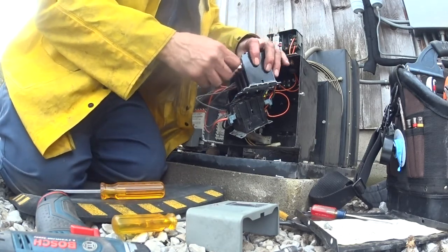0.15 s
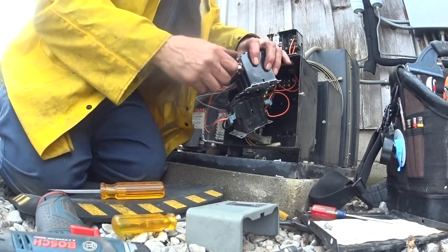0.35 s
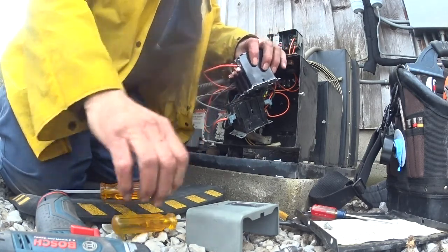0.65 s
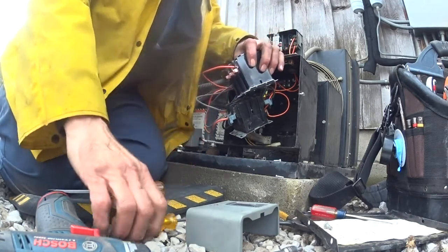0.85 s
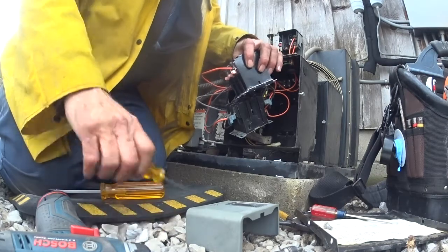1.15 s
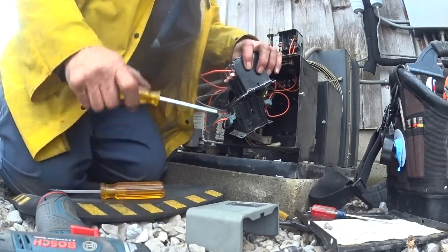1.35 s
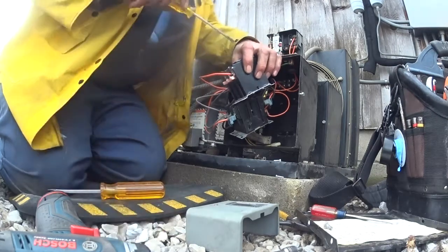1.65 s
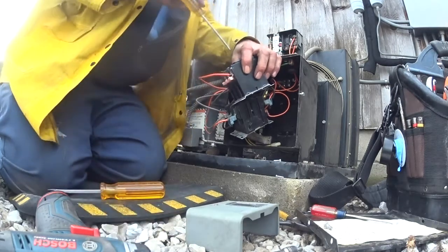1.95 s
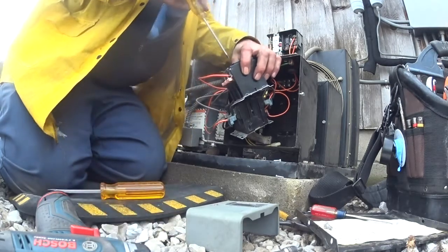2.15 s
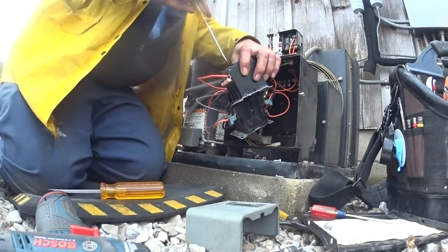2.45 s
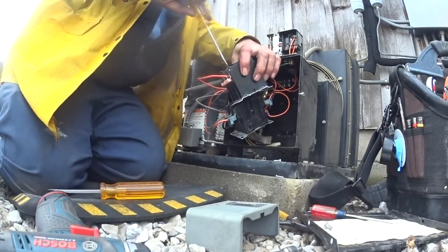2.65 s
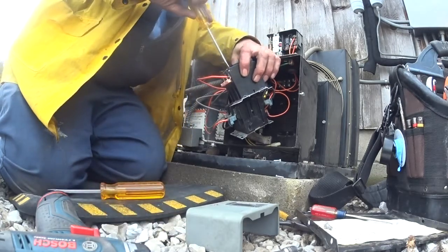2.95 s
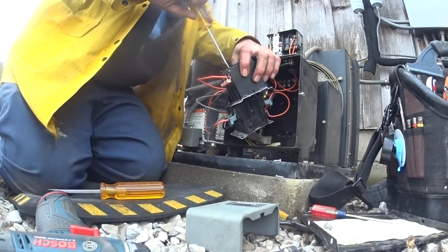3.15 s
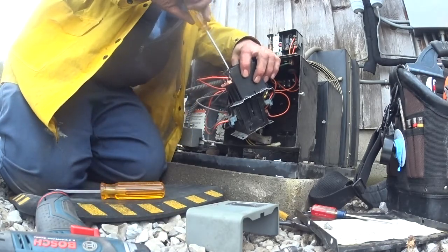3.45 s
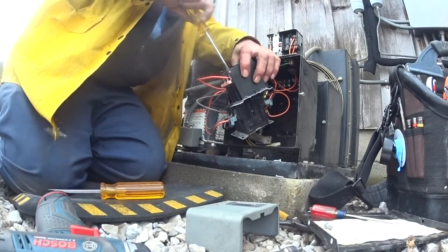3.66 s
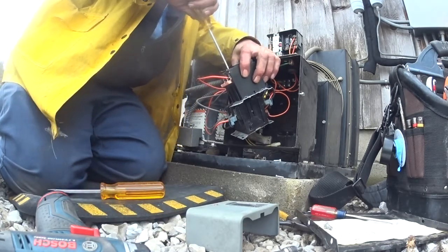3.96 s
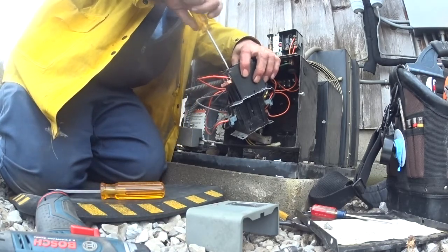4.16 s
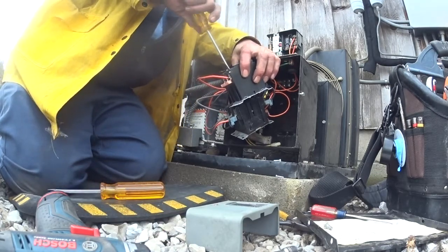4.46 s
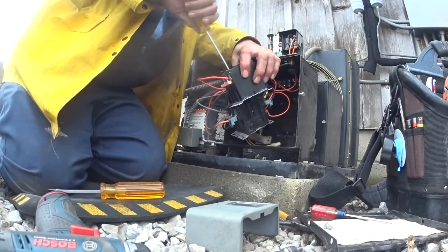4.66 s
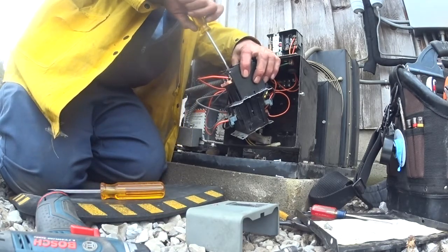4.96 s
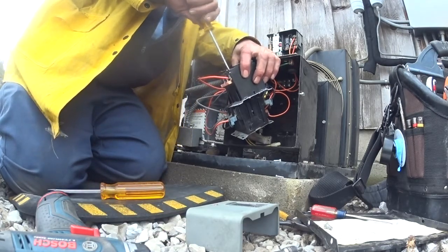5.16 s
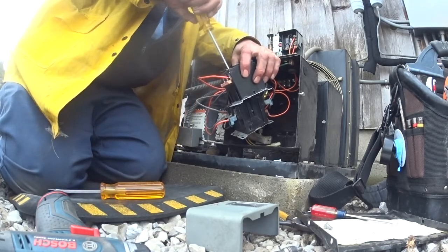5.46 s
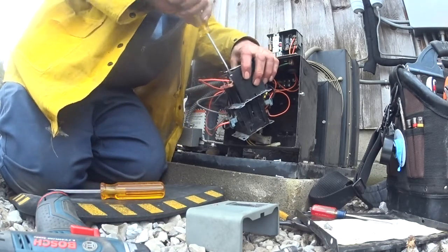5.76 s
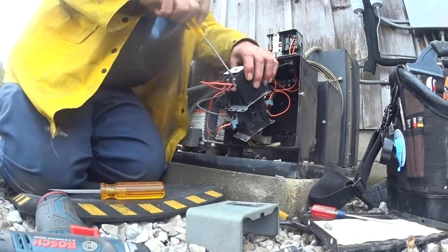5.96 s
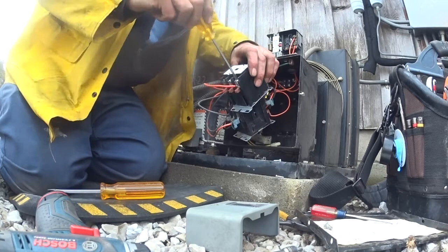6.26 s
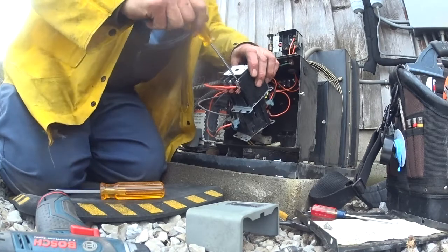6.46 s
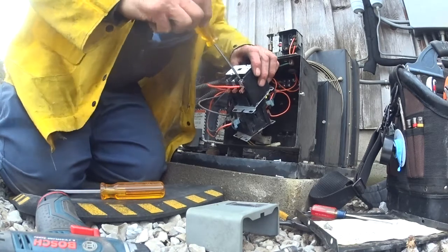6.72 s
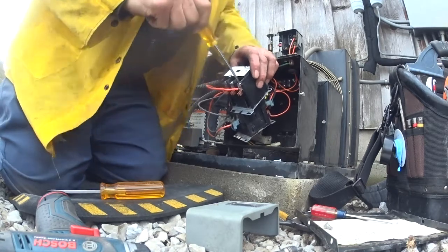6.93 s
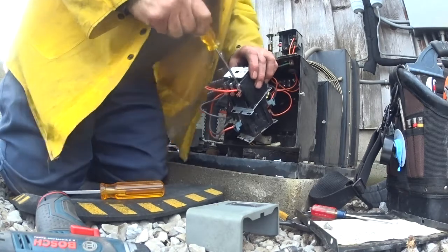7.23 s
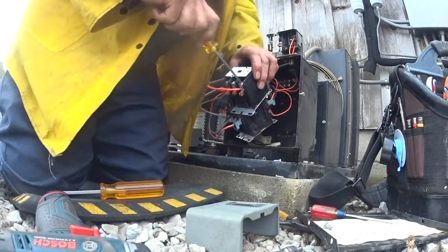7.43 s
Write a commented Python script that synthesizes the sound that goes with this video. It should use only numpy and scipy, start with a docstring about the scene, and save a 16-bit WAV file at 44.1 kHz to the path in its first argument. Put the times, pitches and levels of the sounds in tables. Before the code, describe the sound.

Heard from close by outdoors, the compressor of an air conditioner hums and buzzes throughout over a light hiss. Early on, a metal tool clicks against stones with a short rustle. Later a relay snaps shut with a brief rattle, and the fan gathers speed until its whoosh and low drone fill out the sound. Small screwdriver scrapes and pings come now and then.

```python
"""A close, steady buzz from an outdoor air-conditioning condenser: compressor tones beat against mains hum
over a hiss of refrigerant. A screwdriver clinks on gravel as it is picked up, then scrapes and pings
on a terminal of the contactor. The contactor clacks shut and the fan spins up to a steady rush.
The buzz changes colour as the worker leans over the unit."""
import sys
import numpy as np
from scipy import signal
from scipy.fft import rfft, irfft, next_fast_len
from scipy.io import wavfile
from scipy.ndimage import map_coordinates

SR = 44100
rng = np.random.default_rng(int(sys.argv[2]) if len(sys.argv) > 2 else 0)


def store_pcm(level_fs):
    """Save levels as 16-bit WAV."""
    pcm = np.round(np.clip(level_fs, -1, 1) * 32767).astype(np.int16)
    wavfile.write(sys.argv[1], SR, np.atleast_2d(pcm).T)


N = 334719

MAINS_HZ, SHAFT_HZ, TOP_HZ = 60, 58.78, 11030
BEAT_DIP_S = 5.31  # hum and low compressor tones in antiphase

# Base envelope of the weak harmonics: f/Hz, level/dB
BUZZ_ENVELOPE = [(60, -58), (180, -62), (650, -50.5), (1200, -60.5), (1600, -56.5), (2100, -58.5),
                 (2350, -50), (2850, -59.5), (3200, -49), (3450, -66.5), (3900, -60), (4650, -68.5),
                 (5150, -55), (5700, -62.5), (7200, -63), (8000, -67), (9600, -62.5), (11000, -66.5)]
# Prominent harmonics: shaft order, base level/dB
STRONG_TONES = [(2, -39), (4, -20), (5, -46), (6, -35), (8, -34), (12, -43), (14, -39), (15, -39),
                (17, -40.5), (18, -41), (20, -39), (24, -40.5), (26, -42), (27, -43), (28, -42), (33, -45),
                (37, -45), (41, -46), (43, -45), (60, -43.5), (61, -43), (96, -59)]
# The leaning body alters the sound paths: shaft order, level change/dB
LEAN_CHANGES = [(4, -2), (8, 3), (18, -4), (20, -2), (24, -5), (27, 4), (28, 2), (33, -7), (41, 6),
                (60, -12), (61, 1.5), (96, 13)]
# Balance of the harmonics: f/Hz, left minus right/dB
TONE_PAN = [(120, 7.5), (235, 5), (350, 2), (650, -7), (1050, -5), (1420, -27), (2150, -11), (2450, -2.5),
            (3200, -7), (3700, -5.5), (10000, -1.5)]


def compressor(turns, even_lift_db=8.5, even_below_hz=1800, waver=0.27, lean_mid_s=5.47, lean_span_s=0.81):
    """Each shaft turn repeats one buzzing cycle; its harmonics waver, and shift as the worker leans in."""
    frames, cycle_size = 48, 4096
    orders = np.arange(1, int(TOP_HZ / SHAFT_HZ) + 1)
    hz = orders * SHAFT_HZ
    # two strokes a turn lift the low even orders
    low_even = (orders % 2 == 0) / (1 + (hz / even_below_hz) ** 6)
    upright_db = log_interp(BUZZ_ENVELOPE, hz) + even_lift_db * low_even
    upright_db += rng.normal(0, 3.5, len(hz))
    shift_db = rng.normal(0, 3.0, len(hz))
    pan_db = log_interp(TONE_PAN, hz) + rng.normal(0, 1.0, len(hz))
    for order, db in STRONG_TONES:
        upright_db[order - 1] = db + 0.07
        shift_db[order - 1] = 0
        pan_db[order - 1] = log_interp(TONE_PAN, order * SHAFT_HZ)
    for order, db in LEAN_CHANGES:
        shift_db[order - 1] = db
    frame_s = np.linspace(0, N / SR, frames)[:, None]
    lean = np.clip(.5 + (frame_s - lean_mid_s) / lean_span_s, 0, 1)
    # the lowest tones push in step with the shaft; casing resonances scramble the rest
    phase = rng.uniform(0, 2 * np.pi, len(hz)) * (orders > 4)
    drift = rng.standard_normal((frames, len(hz))) + 1j * rng.standard_normal((frames, len(hz)))
    sway_db = rng.normal(0, 0.52, (frames, 1))
    level = amp(upright_db + lean * shift_db + sway_db)
    tones = level * np.exp(1j * phase) * (1 + waver * hz / (hz + 1500) * drift)
    spectra = np.pad(tones * stereo_gains(hz, pan_db)[:, None], ((0, 0), (0, 0), (1, 0)))
    # one cycle per frame, read by shaft angle
    cycles = irfft(spectra, cycle_size) * cycle_size / np.sqrt(2)
    position = [np.linspace(0, frames - 1, N), turns % 1 * cycle_size]
    return np.array([map_coordinates(channel, position, order=1, mode="grid-wrap") for channel in cycles])


def mains_hum(speed, core_db=-48, idle_db=-47, fan_motor_db=-35, sheet_db=-45):
    """Magnetic hum at even mains multiples; the slipping compressor beats against it."""
    t = clock() - BEAT_DIP_S

    def tone(order, pan_db):
        hz = order * MAINS_HZ
        return -np.sqrt(2) * np.real(stereo_gains(hz, pan_db)[:, None] * np.exp(2j * np.pi * hz * t))

    core = amp(core_db) * tone(2, pan_db=6)
    motors = (amp(idle_db) + amp(fan_motor_db) * np.sqrt(speed)) * tone(4, pan_db=6)
    sheet = amp(sheet_db) * tone(10, pan_db=-3)
    return core + motors + sheet


def fan_speed(start_s=4.22, run_up_s=2.3, bend=1.25, knee=12):
    """Fraction of full speed: the motor pulls the fan up almost evenly, then levels off sharply."""
    ramp = (np.maximum(clock() - start_s, 0) / run_up_s) ** bend
    return ramp / (1 + ramp ** knee) ** (1 / knee)


# Air rush at full speed: f/Hz, density/(dB per Hz)
AIR_SPECTRUM = [(20, -72), (55, -65), (120, -54.5), (180, -45), (300, -45), (450, -45.5), (620, -44),
                (800, -48), (1100, -55.5), (1600, -65), (2500, -66.5), (4000, -74), (7000, -82),
                (11000, -82.5)]
# Blade tones at full speed, before the grille: blade-pass order, level/dB
BLADE_TONES = [(1, -30), (2, -37), (5, -52)]


def fan(speed, full_blade_hz=80.3, eddy_split_hz=520, grille_hz=58):
    """Air rush and blade tones, both growing steeply with fan speed."""
    air = casing_noise(lambda hz: log_interp(AIR_SPECTRUM, hz))
    # large and small eddies swell independently
    large = filtered(air, lambda hz: 1 / (1 + (hz / eddy_split_hz) ** 8))
    small = air - large
    rush = large * amp(wobble(11)) + small * amp(wobble(11))
    angle = 2 * np.pi * np.cumsum(full_blade_hz * speed) / SR
    tones = sum(np.cos(order * angle + .1 * order * wobble(7)) * amp(db + 0.85 * wobble(4.3))
                for order, db in BLADE_TONES)

    def grille(hz):
        """Long waves radiate poorly."""
        highpass = hz ** 4 / np.sqrt(hz ** 8 + grille_hz ** 8)
        return stereo_gains(hz, log_interp(CASING_PAN, hz)) * highpass

    return rush * speed ** 1.88 + filtered(np.sqrt(2) * tones * speed ** 4.2, grille)


# Closing blow and rattle: t/s, level/dB, f/Hz, width/octaves, t60/s
CONTACTOR_HITS = [(4.2044, -22.5, 6000, 1, .14), (4.207, -21.5, 1400, .96, 0.081),
                  (4.207, -24, 620, 0.28, .14), (4.208, -24, 1040, .12, 0.11),
                  (4.228, -23, 1020, .12, 0.071), (4.231, -23.5, 820, .25, .06), (4.25, -27, 510, .2, 0.25)]


def contactor():
    """The contactor snaps shut and rattles its housing."""
    return knocks(CONTACTOR_HITS, pan_db=-6.5, spread=0.96)


# Knocks on stones: t/s, drive level/dB, t60/s
GRAVEL_HITS = [(0.8967, -28, 0.028), (0.946, -26, .025), (1.028, -28, 0.023), (1.0477, -11.5, 0.012),
               (1.055, -14.5, 0.02), (1.057, -30, 0.0091), (1.106, -34, .02), (1.147, -36, 0.018)]
# Resonances of the steel shaft: f/Hz, width/Hz, relative level/dB
STEEL_MODES = [(5200, 170, 6), (7250, 390, 1.5), (8040, 1000, -5), (9940, 400, -0.5)]


def screwdriver(ring_db=11, stone_db=2, stone_low_hz=1200, stone_high_hz=2500):
    """Gritty knocks crack on the stones and ring the steel shaft as the tool is picked up."""
    def response(f):
        steel = sum((-1) ** k * amp(db) * 1j * f * width / (hz ** 2 - f ** 2 + 1j * f * width)
                    for k, (hz, width, db) in enumerate(STEEL_MODES))
        stone = 1j * f / (1j * f + stone_low_hz) / (1 + 1j * f / stone_high_hz)
        return amp(ring_db) * steel + amp(stone_db) * stone

    blows = sum(amp(db) * strike_envelope(start_s, t60_s) for start_s, db, t60_s in GRAVEL_HITS)
    grit = rng.standard_normal(N) + 0.46 * rng.standard_normal((2, N))
    return filtered(grit * blows, response) * pan(-1.0)


# Wire and blade scrapes: t/s, level/dB, f/Hz, t60/s
SCRAPES = [(.0639, -31, 6300, .03), (.1147, -33, 6300, .03), (1.37, -30, 1500, 0.052),
           (1.5884, -27, 6100, .05), (1.604, -32, 5200, .09), (4.61, -25, 5600, 0.031),
           (5.4526, -32, 6500, .038), (7.0, -27.5, 8000, .03), (7.018, -25, 4640, .06),
           (7.029, -32, 6000, .07)]
# Blade slips in the screw: t/s, level/dB
BLADE_SLIPS = [(3.8288, -34), (4.609, -33), (4.985, -37)]


def terminal_work(scrape_octaves=0.49, ring_hz=4100, ring_octaves=0.067, ring_t60_s=0.055):
    """Blade and wires scrape in broad bands; each slip rings the terminal in a narrow one."""
    scrapes = [(start_s, db, hz, scrape_octaves, t60_s) for start_s, db, hz, t60_s in SCRAPES]
    rings = [(start_s, db, ring_hz, ring_octaves, ring_t60_s) for start_s, db in BLADE_SLIPS]
    return knocks(scrapes + rings, pan_db=-8.5, spread=0.15)


def handling(grains_per_s=70, rest_db=-58, grab_db=-41.5, grab_s=0.96, grab_width_s=0.09):
    """Sleeve and fingers crackle, loudest as the hand closes on the gravel."""
    grains = (rng.random(N) < grains_per_s / SR) * rng.lognormal(0, .5, N)
    decay = np.exp(-np.arange(SR // 100) / (0.001 * SR))
    grit = unit_rms(signal.fftconvolve(grains, decay)[:N]) * rng.standard_normal((2, N))
    crackle = unit_band(grit + grit.mean(0), hz=3600, octaves=2.4)
    grab = bell(clock() - grab_s, grab_width_s)
    return crackle * (amp(rest_db) + amp(grab_db) * grab)


# Base spectrum of flow and casing noise: f/Hz, density/(dB per Hz)
HISS_SPECTRUM = [(25, -100), (60, -69), (120, -62.5), (280, -63), (420, -65.5), (620, -62.5), (1000, -64),
                 (1250, -69.5), (1800, -69), (2400, -71.5), (2900, -73), (4400, -80), (5200, -78.5),
                 (6500, -81), (10000, -83)]
# Peaks and notches of casing and pipes: f/Hz, width/Hz, gain/dB
PIPE_RESONANCES = [(228, 19, 7.5), (1520, 120, 3.5), (5100, 130, 3.5), (2380, 31, 9.5), (3260, 38, -6),
                   (3594, 51, 12), (3900, 83, -10.5), (7400, 470, -2.5), (9760, 160, 7)]


def refrigerant(turns, pulse_depth=0.13):
    """Gas hisses in time with the compressor strokes, coloured by casing and pipes."""
    def density_db(f):
        pipes_db = sum(db * bell(f - hz, width) for hz, width, db in PIPE_RESONANCES)
        return log_interp(HISS_SPECTRUM, f) + pipes_db

    strokes = 1 + pulse_depth * np.cos(2 * np.pi * 2 * turns)
    return casing_noise(density_db) * strokes * amp(.6 * wobble(5.5))


# Balance of fan and hiss: f/Hz, left minus right/dB
CASING_PAN = [(60, 5), (110, 6.5), (190, 7.5), (350, 0.5), (620, -5), (1110, -7), (1980, -8), (3550, -9),
              (6370, -9.5), (11400, 3.5)]
# Likeness of left and right noise: f/Hz, coherence
COHERENCE = [(30, 0.89), (120, 1), (300, 0.46), (700, 0.93), (2000, .75), (5000, 0.14), (10000, 0.68)]


def casing_noise(density_db):
    """Partly coherent stereo noise from the unit, shaped by density_db(hz)."""
    def mid_side_gains(hz):
        angle = np.arccos(np.clip(log_interp(COHERENCE, hz), 0, 1)) / 2
        return amp(density_db(hz)) * [np.cos(angle), np.sin(angle)]

    white = rng.standard_normal((2, N)) * np.sqrt(SR / 2)
    mid, side = filtered(white, mid_side_gains)
    left_right = np.array([mid + side, mid - side])
    return filtered(left_right, lambda hz: stereo_gains(hz, log_interp(CASING_PAN, hz)))


# Phase between the channels: f/Hz, left lead/rad
PHASE_LEAD = [(20, 1.5), (120, 0.4), (235, 0.74), (470, -1.22), (700, -1.28), (950, -2), (1200, -2),
              (1550, -1.5), (2000, -3), (2500, -2.5), (3500, -4.5), (4300, -4.5), (7400, -5), (11000, -5.5)]


def stereo_gains(hz, pan_db):
    """Complex left and right gains from the unit, at constant power."""
    left = amp(pan_db / 2) * np.exp(.5j * log_interp(PHASE_LEAD, hz))
    return np.array([left, 1 / left]) / np.sqrt((abs(left) ** 2 + abs(left) ** -2) / 2)


def knocks(rows, pan_db, spread, rise_s=0.00014, size=16384):
    """Short contacts, each a decaying band of noise."""
    out = np.zeros((2, N + size))
    t = np.arange(size) / SR
    for start_s, db, hz, octaves, t60_s in rows:
        noise = rng.standard_normal(size) + spread * rng.standard_normal((2, size))
        envelope = amp(db - 60 * t / t60_s) * (1 - np.exp(-t / rise_s))
        start = round(start_s * SR)
        out[:, start:start + size] += unit_band(noise, hz, octaves) * envelope
    return out[:, :N] * pan(pan_db)


def strike_envelope(start_s, t60_s, rise_s=0.00022):
    """Fast rise, exponential fall."""
    age = np.maximum(clock() - start_s, 0)
    fall = amp(-60 * np.minimum(age / t60_s, 2)) * (age < 2 * t60_s)
    return (1 - np.exp(-age / rise_s)) * fall


def filtered(x, response):
    """Apply a complex response(hz) by FFT."""
    size = x.shape[-1]
    padded = next_fast_len(size + 8192)
    return irfft(rfft(x, padded) * response(np.fft.rfftfreq(padded, 1 / SR)), padded)[..., :size]


def unit_band(x, hz, octaves):
    """Gaussian band-pass in log frequency, scaled to rms 1."""
    return unit_rms(filtered(x, lambda f: bell(np.log2((f + 1) / hz), octaves)))


def wobble(knots_per_s):
    """Smooth random curve."""
    knots = rng.standard_normal(int(N * knots_per_s / SR) + 4)
    return map_coordinates(knots, [clock() * knots_per_s])


def log_interp(points, hz):
    """Read (f/Hz, value) points on a log axis."""
    point_hz, values = np.transpose(points)
    return np.interp(np.log(hz + 1), np.log(point_hz + 1), values)


def bell(offset, width):
    return np.exp(-.5 * (offset / width) ** 2)


def pan(left_minus_right_db):
    return amp([[left_minus_right_db / 2], [-left_minus_right_db / 2]])


def amp(db):
    return 10 ** (np.asarray(db) / 20)


def unit_rms(x):
    return x / np.sqrt(np.mean(x ** 2) + 1e-20)


def clock():
    return np.arange(N) / SR


def scene(throb_db=0.31, fan_throb_db=0.7):
    """The running unit, its starting fan and the tool work in front of it."""
    turns = SHAFT_HZ * (clock() - BEAT_DIP_S) + 0.0022 * wobble(2.06)
    speed = fan_speed()
    # the buzz throbs more once air streams through the casing
    throb = amp((throb_db + fan_throb_db * speed) * wobble(16))
    machine = throb * compressor(turns) + mains_hum(speed) + refrigerant(turns) + fan(speed)
    work = screwdriver() + handling() + terminal_work() + contactor()
    return machine + work


def record(dry):
    """Steep low-pass at TOP_HZ."""
    return filtered(dry, lambda hz: 1 / np.sqrt(1 + (hz / TOP_HZ) ** 400))


dry = scene()
out = record(dry)
store_pcm(out)
```